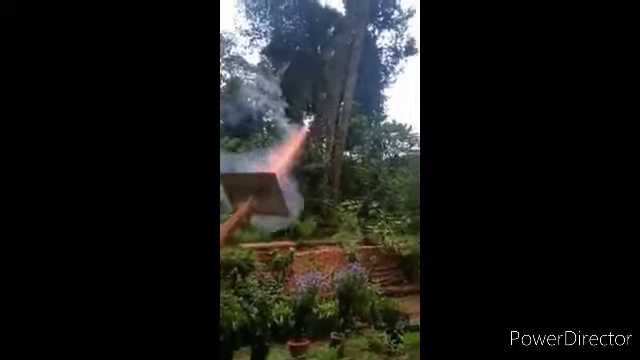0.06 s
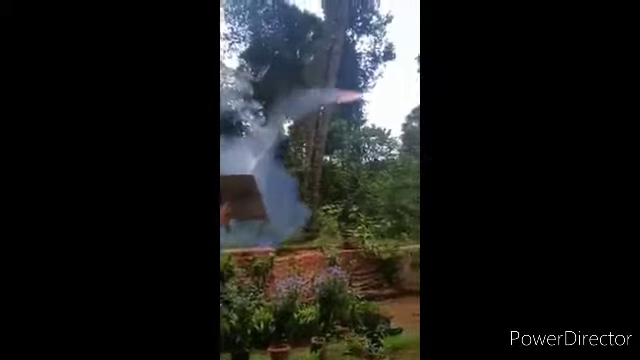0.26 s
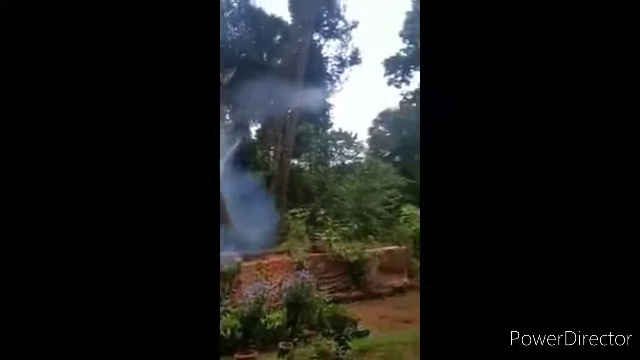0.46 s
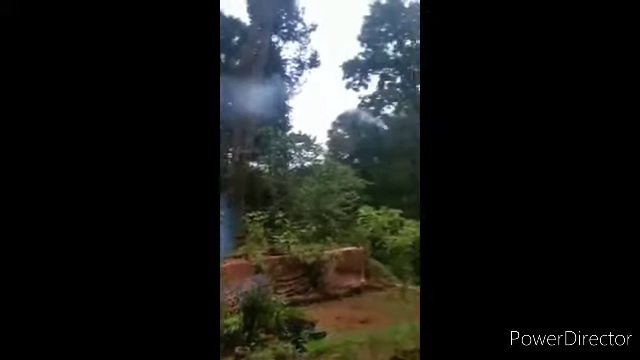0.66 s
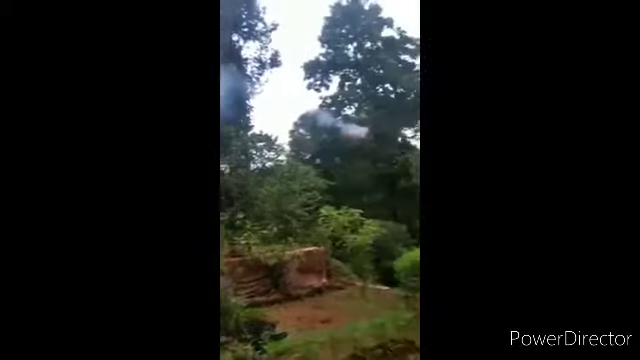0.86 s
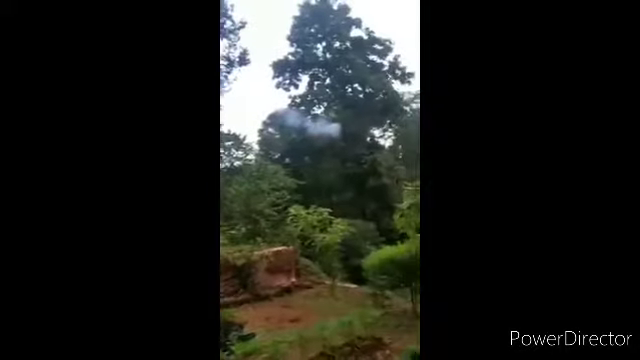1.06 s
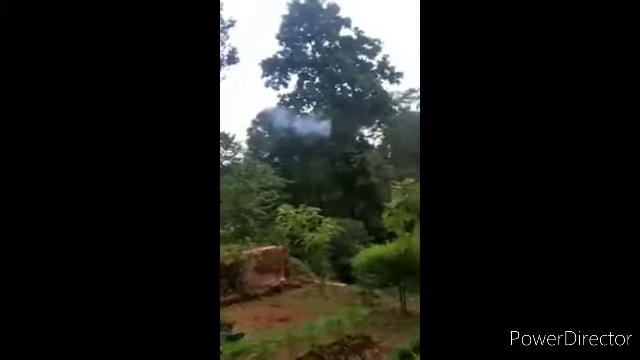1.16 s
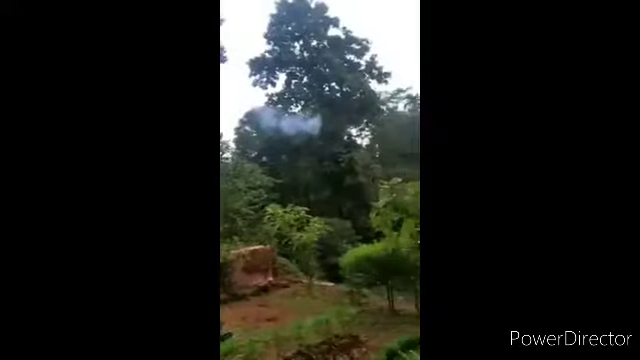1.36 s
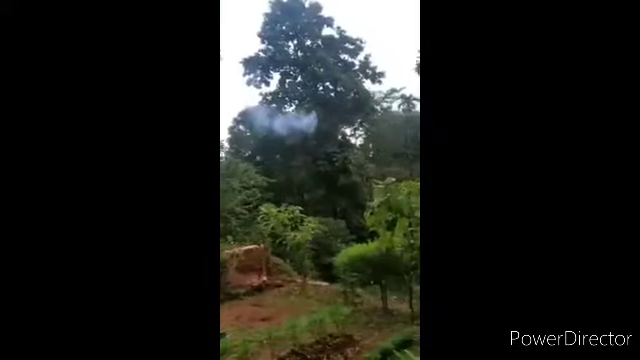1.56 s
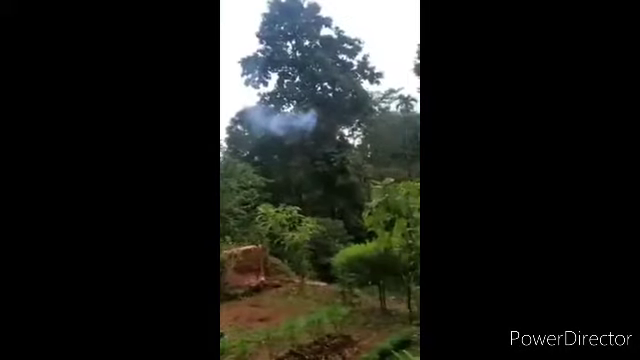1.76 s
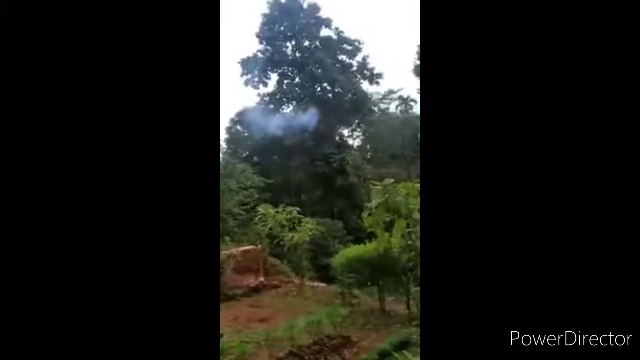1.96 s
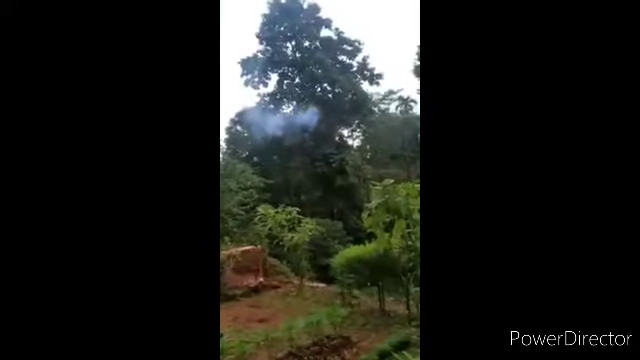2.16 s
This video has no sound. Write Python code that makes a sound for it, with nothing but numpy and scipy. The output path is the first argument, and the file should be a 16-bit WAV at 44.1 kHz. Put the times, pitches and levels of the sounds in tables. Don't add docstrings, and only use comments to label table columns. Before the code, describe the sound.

Faint fuse fizz and cicadas, a hollow puff, a bright sputtering whoosh receding, then a very loud clipped bang about a second in, with thudding reflections and a rumbling outdoor tail among trees.

```python
import sys
import numpy as np
from scipy import signal
from scipy.fft import rfft, irfft, next_fast_len
from scipy.io import wavfile
from scipy.ndimage import uniform_filter1d, map_coordinates

SR = 44100
rng = np.random.default_rng(int(sys.argv[2]) if len(sys.argv) > 2 else 0)


def boost_factor(decibels):
    exponent = np.asarray(decibels, float) / 20
    return 10 ** exponent


def file_out(sig):
    cols = np.atleast_2d(sig).T
    lim = np.clip(cols, -1, 1)
    pcm = np.round(lim * 32767).astype(np.int16)
    wavfile.write(sys.argv[1], SR, pcm)


N = 97020
T = np.arange(N) / SR

# arrival in seconds, peak in dB.
BLAST = [
    (1.0994, 4),
    (1.1004, 1),
    (1.1014, -4),
    (1.1022, 4),
    (1.1030, 4),
    (1.1052, 0),
    (1.1072, -8),
    (1.1096, -4),
]
BANG_S = BLAST[0][0]
# frequency in Hz, left-right likeness from -1 to 1.
ECHO_ALIKE = [(60, 0.99), (180, 1), (550, 0.89), (1650, -0.13), (5000, 0.012), (15000, 0.2)]


def unit(x):
    return x / np.sqrt(np.mean(x ** 2) + 1e-20)


def along(points, hz):
    f, v = np.transpose(points)
    return np.interp(np.log(hz + 1), np.log(f + 1), v)


def curves(rows):
    s, *cols = np.transpose(rows)
    return [np.interp(T, s, c) for c in cols]


def wobble(rate):
    return map_coordinates(rng.standard_normal(N // 8), [T * rate])


def filtered(x, response):
    m = next_fast_len(N + 8192)
    return irfft(rfft(x, m) * response(np.fft.rfftfreq(m, 1 / SR)), m)[..., :N]


def rush(spectrum, alike=((100, 0),), decay=None):
    shut = [(1, -120)] + list(spectrum) + [(spectrum[-1][0] * 1.3, -120)]

    def mid_side(hz):
        turn = np.arccos(np.clip(along(alike, hz), -1, 1)) / 2
        return boost_factor(along(shut, hz)) * [np.cos(turn), np.sin(turn)]

    mid, side = filtered(rng.standard_normal((2, N)), mid_side)
    pair = unit(np.array([mid + side, mid - side]))
    if decay is None:
        return pair
    hz, t, z = signal.stft(pair, SR, nperseg=256)
    return signal.istft(z * boost_factor(decay(hz[:, None], t)), SR, nperseg=256)[1][:, :N]


def blast():
    # frequency in Hz, density in dB per Hz.
    crack_spectrum = [(1500, -22), (3000, 5.5), (7000, 1.5), (14000, -6)]
    crack_lead_s, crack_db, crack_t60_s = 0.0036, -12, 0.084
    front_s, suction_s, suction_db = 0.00018, 0.0039, -3

    u = np.maximum(T - BANG_S + crack_lead_s, 0)
    crack_gain = boost_factor(crack_db - 60 * u / crack_t60_s) * np.minimum(u / crack_lead_s, 1)
    out = crack_gain * rush(crack_spectrum, [(3000, 0.17)])
    for arrival_s, peak_db in BLAST:
        u = np.maximum(T - arrival_s, 0) / front_s
        out += boost_factor(peak_db) * 2.8 * u * u * (1 - u / 5) * np.exp(-u)
    u = np.maximum(T - BANG_S, 0) / suction_s
    return out - boost_factor(suction_db) * u * np.exp(1 - u * u)


def echoes():
    # frequency in Hz, density in dB per Hz.
    bank_spectrum = [(60, -19), (120, 11), (300, 10), (1100, 2), (1600, 3.5), (3000, -28)]
    trunk_spectrum = [(24, -56), (40, -14), (216, -10.5), (401, -4.5), (612, -3.5), (5850, -10.5),
                      (6620, -10.5), (8270, -11.5), (15000, -20)]
    valley_spectrum = [(60, -6), (200, -1), (400, -9), (900, -6.5), (1600, -25)]
    # frequency in Hz, 60 dB decay time in seconds.
    trunk_t60 = [(50, 0.83), (300, 2.14), (1000, 1.44), (3000, 1.285), (8000, 0.99), (14000, 0.72)]
    bank_db, bank_t60_s, bank_rise_s = -1, 0.24, 0.009
    trunk_db, trunk_rise_s, trunk_hold_s = -9.5, 0.01, 0.22
    valley_db, valley_t60_s = -30, 4.13

    u = np.maximum(T - BANG_S, 0)
    bank_gain = boost_factor(bank_db - 60 * u / bank_t60_s) * np.minimum(u / bank_rise_s, 1) ** 2
    bank = bank_gain * rush(bank_spectrum, ECHO_ALIKE)

    def trunk_decay(hz, t):
        late_s = t - BANG_S - trunk_hold_s / (1 + hz / 5000)
        return -60 * trunk_hold_s * np.logaddexp(0, late_s / 0.051) * 0.24 / along(trunk_t60, hz)

    trunks = boost_factor(trunk_db) * rush(trunk_spectrum, ECHO_ALIKE, trunk_decay)
    valley_gain = boost_factor(valley_db - 60 * u / valley_t60_s + 1.7 * wobble(39.97))
    valley = valley_gain * rush(valley_spectrum, ECHO_ALIKE)
    return bank + (1 - np.exp(-u / trunk_rise_s)) * (trunks + valley)


def treeline():
    # frequency in Hz, density in dB per Hz.
    treeline_spectrum = [(250, -32), (450, -3), (700, -1), (1100, -4.5), (1600, -39)]
    delay_s, spread_s, swell_db = 0.27, 0.07, -22
    u = (T - BANG_S - delay_s) / spread_s
    return boost_factor(swell_db) * np.exp(-u * u / 2) * rush(treeline_spectrum, ECHO_ALIKE)


def jet():
    # time in seconds, level in dB, roar over hiss in dB, direct share 0-1.
    thrust = [
        (0, -60.5, 14.5, 0.6),
        (.066, -48.5, 2.5, .5),
        (.176, -41, 10, 0.43),
        (.222, -28, 4, 0.7),
        (.3, -21, -2.5, 0.58),
        (.44, -14, -0.5, 0.94),
        (.62, -13.5, -1.5, 0.73),
        (.76, -18.5, -1.5, 0.52),
        (1.09, -30.5, 0, 0.3),
    ]
    # frequency in Hz, density in dB per Hz.
    hiss_spectrum = [(2500, -46), (4500, -6), (6200, -3), (10000, -6), (11200, -10), (13000, -8.5),
                     (15500, -6.5)]
    roar_spectrum = [(40, -33.5), (200, -20), (1200, -9.5), (3000, -5), (4000, -5), (7000, -31)]
    # frequency in Hz, likeness -1 to 1.
    port_likeness = [(300, .85), (1200, .2), (2600, -.1), (3300, -.9), (4000, -.95), (4700, -.5),
                     (9000, .3), (11200, -.6)]
    # time in seconds, share 0-1 of the shifted likeness.
    bearing = [(.25, .6), (.4, 1), (.47, 0), (.54, 0), (.58, .6), (.68, .3)]
    bearing_shift = 1.32
    fade_s, sputter_db = 0.3, 1

    def flame(alike):
        return rush(hiss_spectrum, alike) + boost_factor(roar_db - 5.5) * rush(roar_spectrum, alike)

    level_db, roar_db, share = curves(thrust)
    share = np.clip(share, 0, 1)
    gain_db = level_db + 0.14 * wobble(13.6) - 60 * np.maximum(T - BANG_S, 0) / fade_s
    swing = curves(bearing)[0]
    ahead = flame(port_likeness)
    aside = flame([(hz * bearing_shift, alike) for hz, alike in port_likeness])
    direct = np.sqrt(1 - swing) * ahead + np.sqrt(swing) * aside
    direct = direct * boost_factor(sputter_db * wobble(700))
    scattered = flame([(300, 1.0), (1200, 0.19)])
    return boost_factor(gain_db) * (np.sqrt(share) * direct + np.sqrt(1 - share) * scattered)


def puff():
    # frequency in Hz, bandwidth in Hz, level in dB.
    pipe_modes = [
        (193, 120, -3.5),
        (407, 110, 3.5),
        (1050, 1200, -9.5),
        (2550, 920, -4.5),
    ]
    puff_s, puff_db, rise_s, fall_s = 0.2168, -26.5, 0.011, 0.033
    flutter_db, pop_db, pop_t60_s = 1.5, -32, 0.02

    def pipe(f):
        response = 0.17
        for k, (center, bandwidth, db) in enumerate(pipe_modes):
            loss = 1j * f * bandwidth
            response = response + (-1) ** k * boost_factor(db) * loss / (center * center - f * f + loss)
        return response

    u = T - puff_s
    common = rng.standard_normal(N) * boost_factor(flutter_db * wobble(254))
    gas = common + 0.58 * rng.standard_normal((2, N))
    swell = np.exp(np.where(u < 0, u / rise_s, -u / fall_s))
    pop = (u > 0) * boost_factor(pop_db - puff_db - 60 * np.abs(u) / pop_t60_s)
    return boost_factor(puff_db) * unit(filtered(gas, pipe)) * (swell + pop)


def fuse():
    # frequency in Hz, density in dB per Hz.
    fuse_spectrum = [(7000, -25), (9000, -4), (10500, 8), (12000, 3), (15000, -8)]
    spit_s, spit_db, rise_s, fall_s = 0.071, -44, 0.026, 0.15
    u = T - spit_s
    envelope = np.exp(np.where(u < 0, u / rise_s, -u / fall_s))
    return boost_factor(spit_db + 2.5 * wobble(300)) * rush(fuse_spectrum) * envelope


def garden():
    # frequency in Hz, density in dB per Hz.
    chorus_spectrum = [(1600, -18), (2300, 1), (3000, 4.5), (4300, 2), (5800, -1), (7000, -18.5),
                       (13000, -23)]
    wind_spectrum = [(18, -9), (35, 6), (60, -5), (100, -11), (200, -18), (400, -18), (1500, -30)]
    # time in seconds, level in dB.
    gusts = [(0, -64.5), (.46, -59), (.59, -70), (.75, -56), (.89, -55), (1.05, -53), (1.3, -53),
             (1.78, -69), (2.0, -55), (2.2, -51)]
    chorus_db, cicada_db, cicada_hz, cicada_width_hz = -39.5, -48, 2707, 110
    swing_db, beat_rate = 1.5, 110

    def song(f):
        return np.exp(-((f - cicada_hz) / cicada_width_hz) ** 2)

    chorus = boost_factor(chorus_db) * rush(chorus_spectrum, [(2000, 0.034)])
    cicada = unit(filtered(rng.standard_normal(N), song)) * boost_factor(swing_db * wobble(beat_rate))
    cicada = cicada * boost_factor([[1.5], [-1.5]])
    wind_gain = boost_factor(curves(gusts)[0] + 3.0 * wobble(7.2))
    wind = wind_gain * rush(wind_spectrum, [(40, 1.0), (1000, 0.4)])
    return chorus + boost_factor(cicada_db) * cicada + wind


def scene():
    return blast() + echoes() + treeline() + jet() + puff() + fuse() + garden()


def thin_spectrum(x):
    # time in seconds, highest frequency in Hz.
    band_limit = [(0, 15500), (1.06, 15500), (1.09, 14800), (1.45, 14500), (1.55, 13700), (2.2, 13700)]
    # frequency in Hz, threshold relative to the local level in dB.
    threshold = [(400, -60), (1200, -12), (2500, -5), (5500, -3.5), (8000, -5), (15000, -6.5)]
    patch_db = 2.5
    hz, t, z = signal.stft(np.array([x[0] + x[1], x[0] - x[1]]) / 2, SR, nperseg=2048)
    line_power = uniform_filter1d(np.abs(z) ** 2, size=3, axis=2)
    local = uniform_filter1d(line_power.max(axis=0), size=25, axis=0)
    patches = uniform_filter1d(rng.standard_normal(z.shape), size=12, axis=1)
    patches = unit(uniform_filter1d(patches, size=4, axis=2))
    floor = local * boost_factor(along(threshold, hz)[:, None] + patch_db * patches) ** 2
    in_band = hz[:, None] < np.interp(t, *np.transpose(band_limit))
    mid, side = signal.istft(z * ((line_power > floor) & in_band), SR, nperseg=2048)[1][:, :N]
    return np.array([mid + side, mid - side])


def roll_off(x):
    return signal.sosfilt(signal.butter(12, 16630, fs=SR, output="sos"), x)


def record(dry):
    duck_s, duck_db, attack_s, recover_s = 1.105, -7, 0.0013, 0.21
    sag_db, sag_s, rebound_db, rebound_s = -10, 0.0094, -21, 0.13
    clip_top, clip_hard = 1, 2.34

    late = T - duck_s
    gain_db = duck_db * np.clip(late / attack_s + 1, 0, 1) * np.clip(1 - late / recover_s, 0, 1)
    u = np.maximum(T - BANG_S, 0)
    rebound = boost_factor(rebound_db) * u / rebound_s * np.exp(0.5 - 0.5 * (u / rebound_s) ** 2)
    sag = boost_factor(sag_db) * u / sag_s * np.exp(1 - u / sag_s)
    x = dry * boost_factor(gain_db) + [[0], [1]] * (rebound - sag)
    clipped = x / (1 + np.abs(x / clip_top) ** clip_hard) ** (1 / clip_hard)
    mix = thin_spectrum(clipped)
    return roll_off(mix)


dry = scene()
out = record(dry)
file_out(out)
```